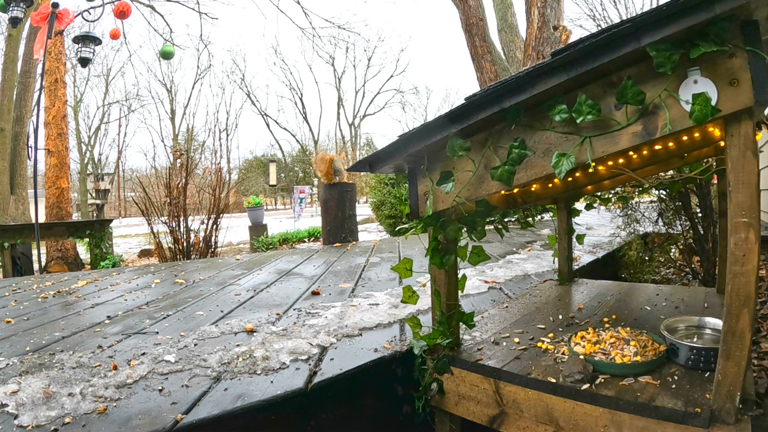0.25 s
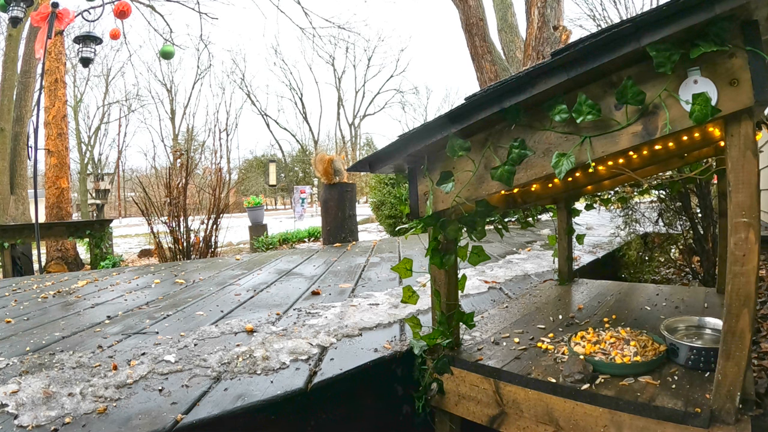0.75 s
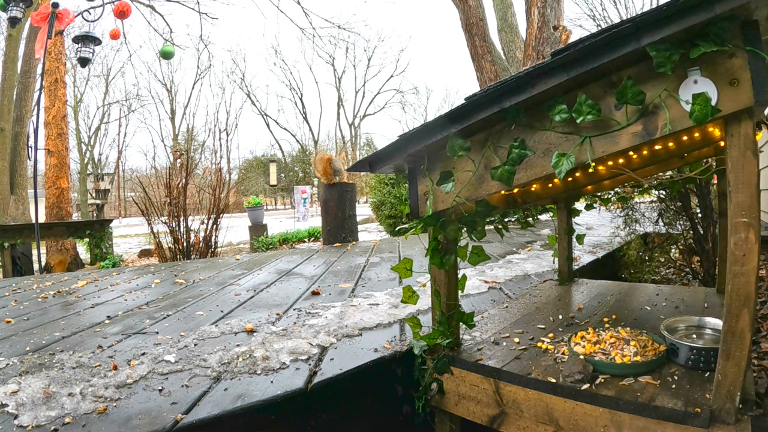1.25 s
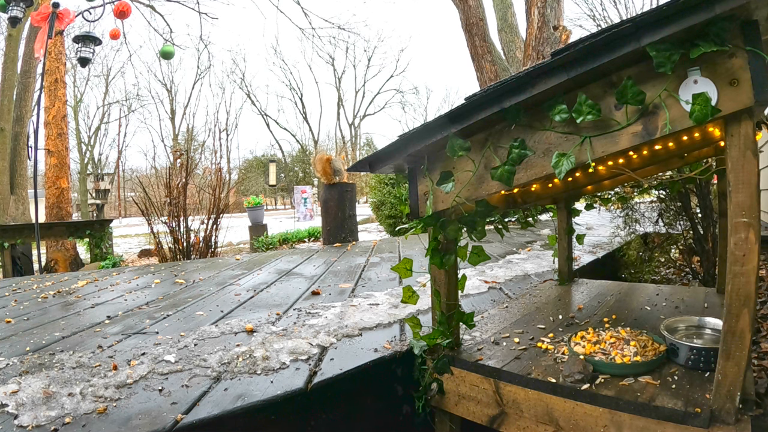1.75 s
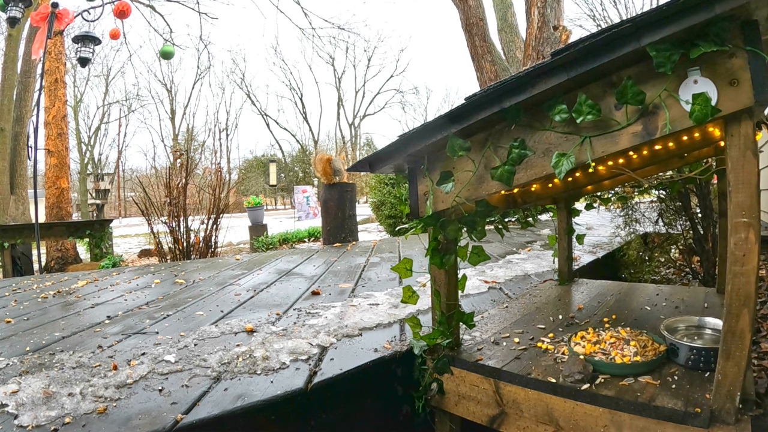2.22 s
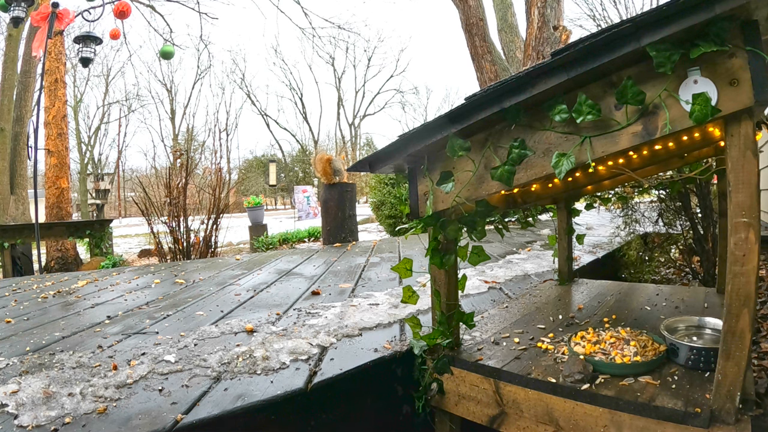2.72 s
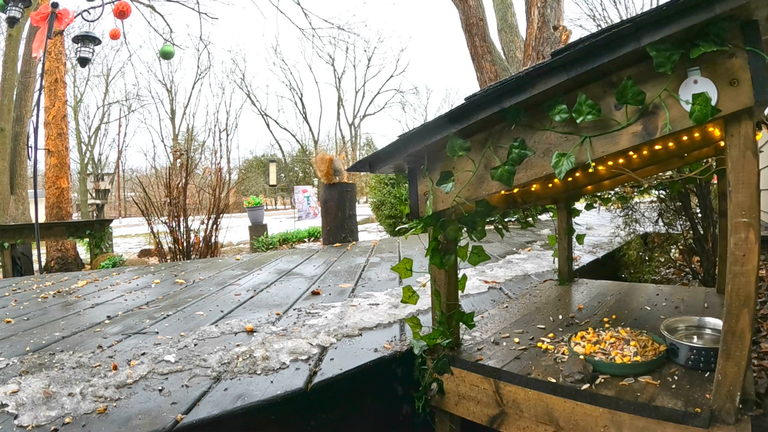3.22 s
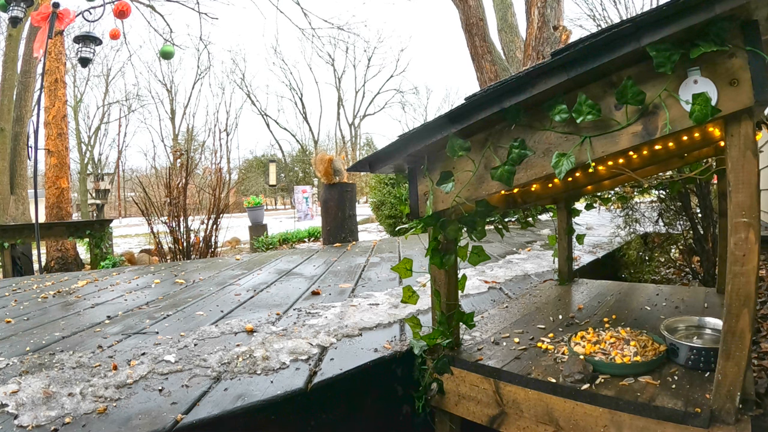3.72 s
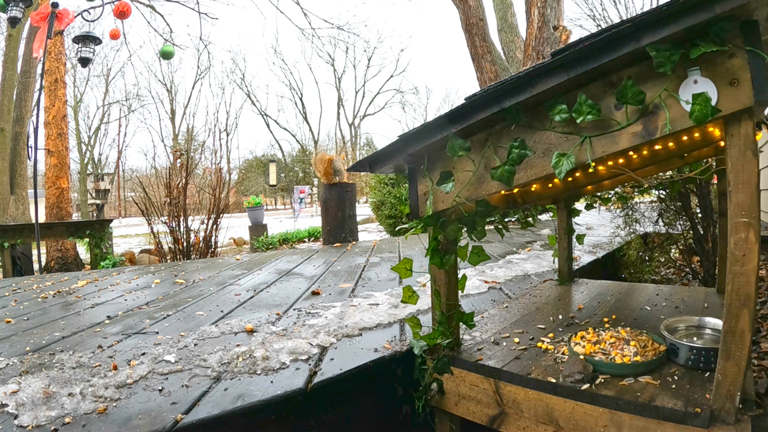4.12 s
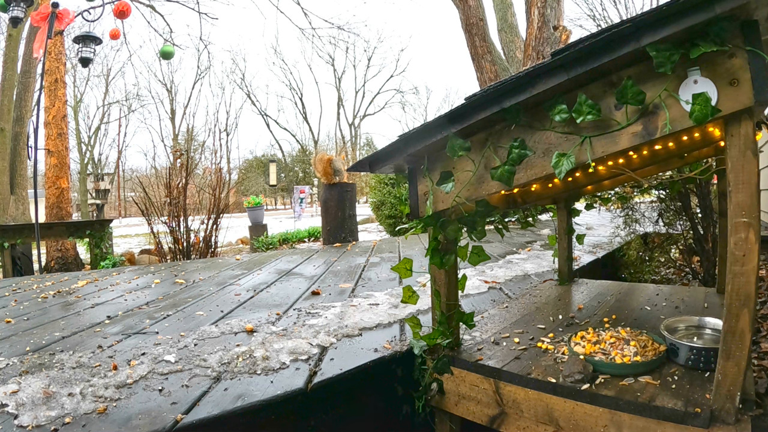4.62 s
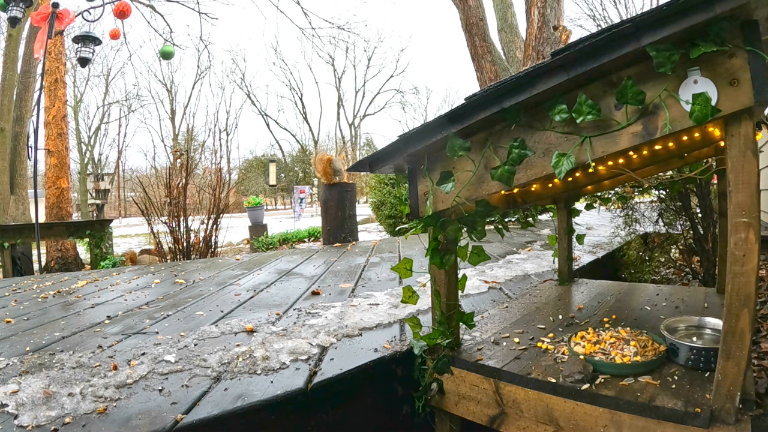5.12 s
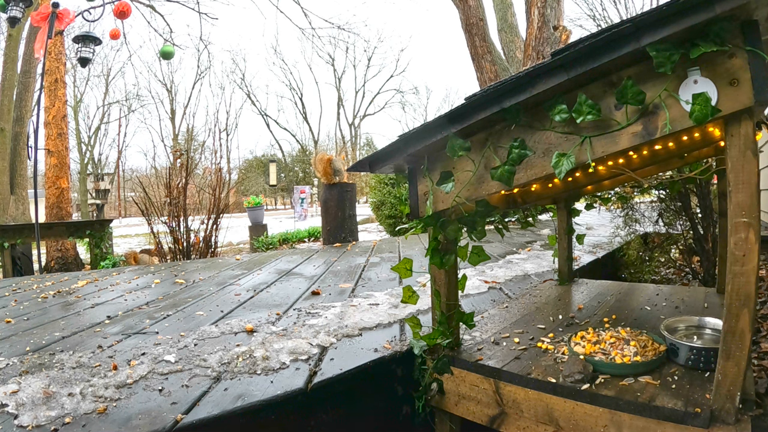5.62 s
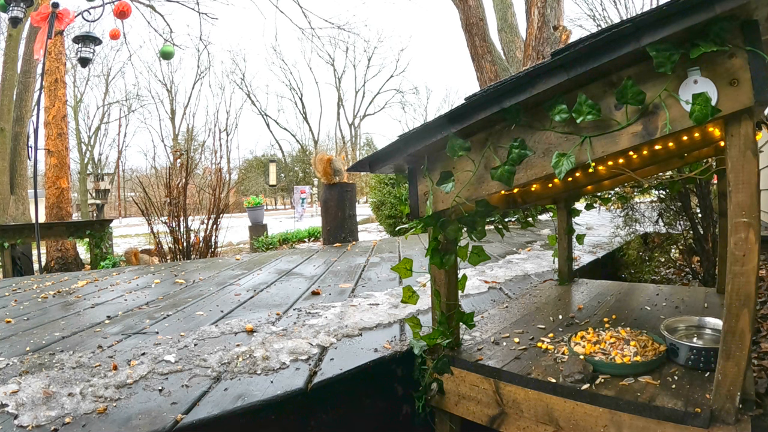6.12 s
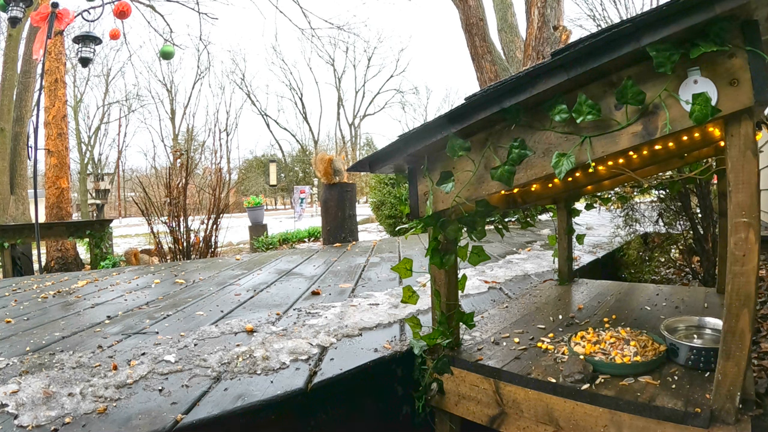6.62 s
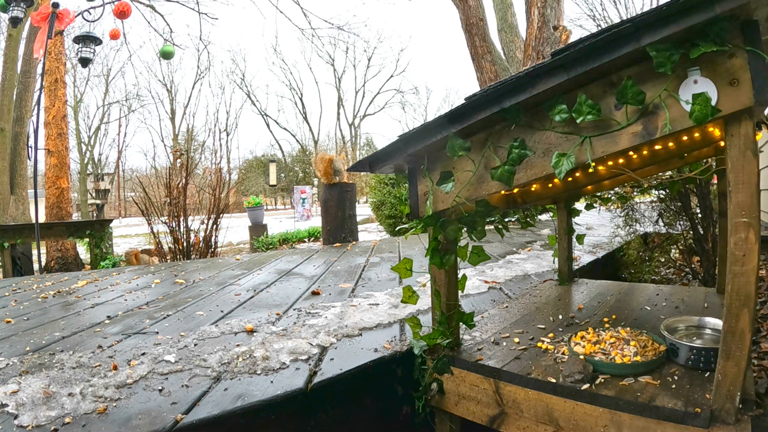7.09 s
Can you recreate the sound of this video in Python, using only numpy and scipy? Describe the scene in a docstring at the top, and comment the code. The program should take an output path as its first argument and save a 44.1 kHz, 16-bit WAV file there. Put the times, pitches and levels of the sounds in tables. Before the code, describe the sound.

Many small songbirds chirp in dense overlapping chatter over low rumbling air, with soft wooden thumps around a backyard feeding shelter.

```python
"""A low rumble of air opens the scene, and at once small songbirds chatter round a wooden feeding shelter
in a snowy yard. Each chirp is a gliding whistle, clean or raspy; squawks add rushing air to a tumbling pitch.
Soft thumps ring the shelter's damped boards, beak clicks are bursts of noise, and a jay cries twice further off
in harmonics shaped by its throat. Boards mirror the birds and trees scatter them, over far engine and road noise."""
import sys
import numpy as np
from scipy import signal
from scipy.fft import rfft, irfft, next_fast_len
from scipy.io import wavfile
from scipy.ndimage import map_coordinates

SR = 44100
rng = np.random.default_rng(int(sys.argv[2]) if len(sys.argv) > 2 else 0)


def wav_out(sig):
    """Save sig, one row per channel (or a flat mono array), as 16-bit PCM at SR to the path in sys.argv[1]."""
    wavfile.write(sys.argv[1], SR, np.round(np.clip(np.atleast_2d(sig).T, -1, 1) * 32767).astype(np.int16))


N = 324135
TIME = np.arange(N) / SR


def undb(db):
    """Decibel law: level to amplitude ratio."""
    return 10 ** (np.asarray(db) / 20)


def unit(x):
    """Normalisation: scale to rms 1."""
    return x / np.sqrt(np.mean(x ** 2) + 1e-20)


def pan(db):
    """Interaural level difference: left and right gains, left minus right in dB, at equal power."""
    return unit(undb(np.array([[db], [-db]]) / 2))


def add(out, start, sound):
    """Superposition: mix a sound in at a time in seconds."""
    i = max(int(start * SR), 0)
    out[..., i:i + sound.shape[-1]] += sound[..., :N - i]


def colour(hz, points):
    """Spectral envelope: gain from (f/Hz, level/dB) points on a logarithmic frequency axis."""
    f, db = np.transpose(points)
    return undb(np.interp(np.log(hz + 1e-9), np.log(f), db))


def noise(points, size):
    """Filtered noise: a random spectrum under a given envelope, rms 1."""
    spectrum = rfft(rng.standard_normal(size))
    gain = colour(np.fft.rfftfreq(size, 1 / SR), points)
    return unit(irfft(spectrum * gain, size))


def wander(rate, size):
    """Random modulation: smooth motion through `rate` random values a second, spread about 1."""
    place = np.arange(size) * rate / SR
    values = rng.standard_normal(int(place[-1]) + 3)
    return map_coordinates(values, [place + 1], order=3, mode="nearest")


def wide(points, side_db):
    """Partial coherence: noise common to both ears plus a weaker part of opposite sign."""
    middle, side = noise(points, N), noise(points, N)
    return unit(middle + undb(side_db) * side * np.array([[1], [-1]]))


def swell(u, attack, release):
    """Amplitude envelope: rounded rise and fall over a call, u from 0 to 1."""
    edge = np.minimum(u / attack, (1 - u) / release)
    return np.sin(np.pi / 2 * np.clip(edge, 0, 1)) ** 2


# low air rumble: t/s, level/dB before the overall trim
AIR_RUMBLE = [(0, -38), (.6, -36), (.9, -32), (1.55, -31.5), (1.8, -29.5), (2.15, -29.5), (2.3, -35.5),
              (2.6, -32), (3, -39), (3.65, -37.5), (3.83, -29.5), (4.1, -37.5), (4.6, -36), (6, -36),
              (6.5, -35), (7.1, -40.5)]
# spectrum of the air rumble: f/Hz, relative level/dB per Hz
AIR_RUMBLE_SPECTRUM = [(15, 1), (32, 4.5), (60, 1.5), (90, 0), (130, -13), (180, -17.5), (250, -20.5),
                       (350, -32.5), (500, -43), (1500, -59), (5000, -88)]
# far engine: t/s, mean firing rate f/Hz, level/dB before the overall trim
FAR_ENGINE = [(0, 63.9, -41.5), (4.3, 60.13, -51), (4.7, 59.14, -47), (5.1, 63.52, -41),
              (5.75, 66.34, -39.5), (6.3, 66.35, -40.5), (6.7, 60.02, -43), (7.35, 60.8, -33.5)]
# spectrum of tyres on a road: f/Hz, relative level/dB per Hz
ROAD_SPECTRUM = [(100, 1.5), (300, -6.5), (480, -10.5), (700, -4.5), (980, 1), (1400, -3.5), (2000, -9.5),
                 (3200, -18), (5000, -29), (8000, -39), (14000, -58)]


def background(rumble_db=1.0, road_db=-49.5, engine_db=-1):
    """Broadband and periodic sources: air rumble and tyre hush are noise, the far engine a two-partial hum."""
    rumble_level = np.interp(TIME, *np.transpose(AIR_RUMBLE)) + rumble_db
    rumble = wide(AIR_RUMBLE_SPECTRUM, side_db=-13.5) * undb(rumble_level) * pan(-1.4)

    s, hz, db = np.transpose(FAR_ENGINE)
    firing_hz = np.interp(TIME, s, hz) * (1 + 0.017 * wander(15, N))
    phase = 2 * np.pi * np.cumsum(firing_hz) / SR
    hum = unit(np.sin(phase) + undb(-9.0) * np.sin(2 * phase))
    engine = hum * undb(np.interp(TIME, s, db) + engine_db + 2 * wander(9.9, N))

    road_level = road_db + .5 * wander(1.706, N) + .5 * wander(12, N)
    road = wide(ROAD_SPECTRUM, side_db=-6.5) * undb(road_level) * pan(3.2)
    return rumble + engine + road


def chirp(start, length, shape, turn_hz, rasp, overhang=.005, waver=0.02, rasp_waver=0.0478,
          flutter_db=2.5, rasp_noise=1.0, stress_db=10, second_db=-27, third_db=-41):
    """Frequency modulation: the syrinx glides through a rounded turn; rasp shakes its pitch and strength."""
    place, start_ratio, end_ratio, stress = shape
    turn = start + length * np.clip(place, 0, 1)
    t = np.arange(start - overhang, start + length + overhang, 1 / SR)
    n, rasp = len(t), np.clip(rasp, 0, 1)

    # distance from the turn: 0 there, 1 at the start or the end
    before = np.clip((t - turn) / min(start - turn, -1e-3), 0, 1.2) ** 1.6
    after = np.clip((t - turn) / max(start + length - turn, 1e-3), 0, 1.2) ** 1.6
    hz = turn_hz * (1 + (start_ratio - 1) * before + (end_ratio - 1) * after)
    hz = hz * (1 + waver * wander(196.9, n) + rasp_waver * rasp * wander(894, n))
    phase = 2 * np.pi * np.cumsum(hz) / SR

    # irregular motion of the membranes spreads a band of noise round the whistle
    shake = 1 + rasp_noise * rasp * (wander(996, n) + 1j * wander(1011.0, n))
    tone = np.exp(1j * phase) + undb(second_db) * np.exp(2j * phase)
    tone = tone + undb(third_db) * np.exp(3j * phase) * (hz < SR / 6)  # keep the third below SR / 2
    u = np.linspace(0, 1, n)
    level_db = flutter_db * wander(176.0, n) - stress_db * abs(u - stress)
    pressure = swell(u, attack=0.1, release=0.078) * undb(level_db)
    return unit(np.imag(shake * tone) * pressure)


# air rushing through a squawk: f/Hz, relative level/dB per Hz
SQUAWK_AIR_SPECTRUM = [(1400, -28), (3200, -10), (5000, -13), (8500, -1), (12000, -7), (16000, -34)]


def squawk(half, hz, swing=.07, climb=0.026, overtone_db=-14, air_db=-8):
    """Forced oscillation: the pitch climbs and tumbles fast, with some rushing air."""
    t = np.arange(-2 * half, 2 * half, 1 / SR)
    n = len(t)
    pitch = hz * (1 + climb * t / half + swing * wander(300, n) + 0.0513 * wander(1200, n))
    phase = 2 * np.pi * np.cumsum(pitch) / SR
    air = noise(SQUAWK_AIR_SPECTRUM, n)
    voice = unit(np.sin(phase) + undb(overtone_db) * np.sin(2 * phase))
    return unit(voice + undb(air_db) * air) * np.exp(-(t / half) ** 2) * undb(3.4 * wander(304.0, n))


def perch(sound, pan_db, spread_s=3.4e-5):
    """Interaural time and level difference: a level for each ear and a slight random lag between them."""
    lag = int(round(spread_s * SR * rng.standard_normal()))
    return np.array([np.roll(sound, lag), sound]) * pan(pan_db)


# near chirps, and one faint, low further call at 4.038 s: t/s at the start, length/s, note shape, f/Hz at the
# turn, # level/dB before the flock trim, rasp 0-1, left minus right level/dB
NEAR_CHIRPS = [(0.02, 0.11, "arch", 3760, -43, 0.3, 7), (0.136, 0.043, "fall", 3300, -42, .1, 0.5),
               (.22, 0.027, "rise", 6950, -51.5, 0.5, 5), (0.237, .034, "rise", 5520, -46, 0.1, 5),
               (.271, .054, "hook", 4090, -39, 0.17, 5), (.327, 0.025, "rise", 3817, -47.5, 0.4, 5),
               (.354, 0.061, "peak", 3820, -45.5, 0.45, 3), (0.57, .05, "fall", 3550, -64, .3, 8),
               (0.777, 0.036, "flat", 2850, -53, 0.9, -2), (.808, 0.038, "step", 4670, -51.5, 0.3, -12),
               (0.873, 0.056, "lift", 2685, -45, 0.3, 0), (0.88, 0.046, "dip", 5300, -55.5, 0.8, -1),
               (0.928, 0.018, "hook", 4040, -46.5, 0.54, -3), (0.98, 0.1, "slide", 4340, -49, 0.24, 5),
               (1.069, 0.061, "slide", 2620, -50.5, .3, 7), (1.215, 0.037, "arch", 5330, -43.5, 0.4, 4),
               (1.247, 0.067, "flat", 5250, -53, 0.7, 0), (1.285, 0.053, "peak", 4210, -44.5, 0.7, 0),
               (1.327, .053, "hook", 3420, -44, 0, -1), (1.379, 0.06, "arch", 4470, -39, 0.4, 6),
               (1.454, 0.075, "rise", 4170, -42, 0.46, 0), (1.471, .042, "arch", 4870, -43, .3, 7),
               (1.526, 0.059, "arch", 3660, -39.5, 0.68, 3), (1.728, .11, "peak", 4550, -58.5, 0.73, 5),
               (1.886, 0.047, "hook", 4264, -36.5, 0.77, 6), (1.905, 0.031, "hook", 5470, -43, 0.7, 4),
               (1.935, 0.067, "arch", 3506, -38.5, 0.47, 4), (1.984, 0.053, "rise", 4430, -38.5, 0.16, 8),
               (2.051, .036, "fall", 3440, -48, 0.54, 9), (2.094, .04, "rise", 5360, -47, 0.46, -3),
               (2.116, 0.047, "arch", 3510, -41, 0.3, -2), (2.162, 0.034, "flat", 3083, -39.5, 0, 1.5),
               (2.195, 0.06, "peak", 5520, -45, 0.17, 5), (2.257, 0.033, "peak", 4940, -40, 0.3, 6),
               (2.281, 0.047, "hook", 4400, -42, 0.36, 2), (2.392, 0.05, "arch", 5000, -39, 0.15, 2),
               (2.447, 0.039, "arch", 4230, -40.5, 0.2, 5), (2.478, 0.051, "rise", 4140, -40.5, 0.4, 7),
               (2.504, 0.031, "step", 2610, -49.5, 0.53, 7), (2.539, 0.057, "slide", 3600, -43, 0.16, 10),
               (2.58, 0.052, "arch", 3590, -42, 0.88, 3), (2.612, 0.048, "lift", 3124, -43.5, 0.74, -1),
               (2.647, 0.048, "flat", 7740, -46.5, 0, 4), (2.679, 0.076, "step", 6010, -40.5, 0.32, 5),
               (2.731, 0.056, "peak", 4530, -38.5, 0.5, 5), (2.74, .1, "flat", 5840, -48.5, 0.17, 2),
               (2.793, 0.06, "dip", 3080, -37.5, 0.02, 5), (2.846, 0.029, "slide", 3170, -46.5, 0.2, 2),
               (2.884, 0.071, "hook", 4410, -36, 0.18, 3), (2.964, 0.051, "rise", 3670, -47, 0.17, 0),
               (2.984, 0.034, "hook", 4880, -35.5, 0.6, 9), (3.021, 0.058, "hook", 4960, -42, 0.4, -3),
               (3.037, 0.081, "rise", 3730, -45, 0.3, 4), (3.05, 0.0224, "step", 7340, -47, 0.1, 0),
               (3.197, 0.055, "hook", 4650, -37.5, 0.77, 7), (3.237, 0.051, "arch", 3990, -41, 0.6, 9),
               (3.282, 0.044, "hook", 4780, -40.5, 0.37, 5), (3.313, .02, "rise", 5070, -41.5, 0.45, 3),
               (3.328, 0.059, "fall", 3900, -44.5, 0, 9), (3.375, 0.049, "hook", 4920, -42, 0.74, 5),
               (3.43, 0.029, "lift", 3000, -44.5, 0, -1), (3.446, 0.067, "dip", 2990, -48, 0.4, 1),
               (3.525, 0.041, "arch", 4350, -38, .5, 9), (3.559, 0.021, "step", 5080, -36, 0, -1),
               (3.578, 0.025, "slide", 4050, -31.5, 0, -1), (3.604, 0.053, "flat", 3427, -34.5, 0.43, 3),
               (3.655, 0.068, "dip", 3150, -42, 0.98, 10), (3.723, 0.069, "hook", 4870, -42.5, 0.33, 4),
               (3.764, 0.077, "dip", 3022, -41.5, 0.57, 2), (3.81, 0.041, "arch", 3790, -47, 0.38, 2),
               (3.816, 0.045, "slide", 2540, -48.5, 0.25, 8), (3.823, 0.057, "fall", 4800, -43.5, 0.2, 4),
               (3.907, 0.049, "hook", 4970, -42, 0.7, 4), (3.964, 0.033, "lift", 2984, -41, 0, 11),
               (4.004, 0.031, "fall", 3630, -48.5, 0.6, 6), (4.033, .058, "rise", 5360, -49, 0.77, 5.5),
               (4.038, 0.18, "arch", 1900, -55.5, 0.9, 0), (4.076, .055, "lift", 3070, -45, 0.4, 4),
               (4.133, 0.058, "hook", 4375, -36, 0.47, 3), (4.166, 0.073, "hook", 5900, -44, 0.1, 4),
               (4.201, 0.022, "lift", 3010, -37.5, 0.4, 2), (4.224, 0.054, "arch", 5520, -41.5, 0.02, 5),
               (4.278, 0.055, "fall", 4580, -45.5, 0.95, 3), (4.331, 0.057, "step", 4620, -42.5, 0.07, 10),
               (4.355, 0.057, "flat", 7670, -51.5, .1, 5), (4.396, 0.054, "hook", 4550, -38, 0.5, 4),
               (4.402, 0.073, "flat", 5700, -43.5, 0.2, 1), (4.465, 0.0398, "flat", 3770, -38, 0.3, 3),
               (4.516, 0.036, "lift", 2935, -46.5, .4, -3), (4.539, 0.069, "hook", 4500, -36.5, 0.47, 3),
               (4.612, 0.061, "flat", 3366, -36, 0.47, 2), (4.68, 0.022, "rise", 4820, -44, 0.2, 7),
               (4.709, 0.044, "fall", 4230, -44.5, 0.06, 5), (4.761, 0.047, "step", 4940, -36, 0.02, 5),
               (4.783, 0.077, "dip", 3160, -40, 0.43, 0), (4.848, 0.033, "slide", 3480, -42, .7, 3),
               (4.975, 0.052, "rise", 5045, -37, 0.65, 8), (5.054, 0.07, "peak", 3830, -41, 0.67, 0.5),
               (5.094, 0.053, "arch", 5490, -40.5, 0, 12), (5.112, 0.052, "arch", 3335, -43.5, 0.43, 0),
               (5.169, 0.023, "lift", 3800, -37, 0.06, 4), (5.191, 0.031, "fall", 4920, -39.5, 0.5, 6),
               (5.217, 0.036, "flat", 4570, -49, .3, 9), (5.244, 0.042, "arch", 4030, -44.5, 0.1, 5),
               (5.272, 0.06, "arch", 3240, -49, .1, 19), (5.374, 0.03, "arch", 4390, -45, 0.3, 13),
               (5.431, 0.043, "peak", 3660, -44.5, 0, 23), (5.483, 0.052, "arch", 5020, -40.5, 0.5, 0),
               (5.529, 0.067, "dip", 2974, -39.5, 0.36, 2), (5.534, 0.062, "fall", 4350, -39, 0.36, 6),
               (5.552, 0.051, "arch", 5330, -42.5, 0.43, 4), (5.591, 0.04, "dip", 3320, -38, 0.46, 3),
               (5.622, 0.043, "dip", 3117, -39, 0.67, 2), (5.724, 0.064, "hook", 6580, -44.5, 0.66, 1),
               (5.818, .03, "dip", 4000, -49, 0.3, 9), (5.842, 0.024, "step", 5330, -47, 0.24, 1),
               (5.846, 0.039, "arch", 3730, -46, 0.05, 13), (5.953, 0.059, "flat", 5450, -52, 0.2, 2),
               (5.985, 0.044, "arch", 4503, -41, 0.5, 5), (6.028, 0.058, "hook", 3975, -42, 0.04, 3),
               (6.073, 0.022, "flat", 3100, -43, 0.4, 4), (6.084, .042, "arch", 4730, -40.5, .3, 8),
               (6.103, 0.069, "slide", 3547, -40.5, 0.43, 2), (6.179, 0.026, "rise", 4350, -44.5, .3, 1),
               (6.215, 0.061, "flat", 3256, -44, 0.85, 10), (6.369, 0.041, "hook", 5240, -37, 0, 2),
               (6.455, 0.035, "hook", 4405, -40.5, 0.17, 5), (6.511, 0.04, "hook", 4940, -40, 0.16, 8),
               (6.558, 0.051, "flat", 4520, -41, 0.62, 5), (6.6, 0.079, "hook", 3930, -43.5, 0.7, 5),
               (6.708, 0.052, "arch", 4055, -40, 0.6, 7), (6.772, 0.032, "arch", 4600, -44, 0.66, -3),
               (6.782, 0.049, "arch", 4046, -38, 0.7, -1), (6.824, 0.048, "flat", 3483, -43, 0.54, 1),
               (7.006, 0.042, "rise", 5900, -48, 0.57, 6), (7.039, 0.082, "arch", 3816, -38, 0.36, 7),
               (7.146, 0.0434, "flat", 7600, -50, 0.2, 4), (7.18, 0.025, "flat", 5040, -42, .3, 8),
               (7.221, 0.034, "flat", 3125, -36, 0.33, 4), (7.259, 0.039, "hook", 4280, -39.5, 0.25, -2),
               (7.295, 0.046, "fall", 4020, -46, 0.46, 5)]
# note shapes, by name: place of the turn 0-1, start f / turn f, end f / turn f, loudest point 0-1
CHIRP_SHAPES = {"arch": (0.47, .78, .77, 0.59), "peak": (0.5, .63, .63, 0.61),
                "hook": (0.252, .8, .73, 0.51), "step": (0.19, 0.66, .94, 0.26), "rise": (.8, .75, 1, 0.51),
                "lift": (0.16, 1.2, 1.38, 0.49), "dip": (0.484, 1.18, 1.3, 0.59),
                "fall": (0.151, 1.02, .75, 0.57), "slide": (0.23, 1.2, .77, 0.5),
                "flat": (0.373, .92, .93, 0.45)}
# hoarse squawks: t/s at the middle, half length/s, level/dB before the flock trim, centre f/Hz
NEAR_SQUAWKS = [(0.065, 0.03, -44, 4690), (0.818, 0.023, -52.5, 5160), (1.22, 0.031, -54, 7400),
                (1.88, 0.02, -53, 4640), (3.054, 0.017, -51, 6760), (3.273, 0.02, -47.5, 7230),
                (3.593, 0.034, -46.5, 6020), (3.996, 0.072, -57, 6500), (4.55, 0.043, -44, 5860),
                (5.363, 0.019, -50, 7600), (5.514, 0.052, -47.5, 5760), (5.737, 0.034, -50.5, 6940),
                (5.82, 0.027, -54.5, 8240), (6.333, 0.025, -49.5, 6090), (6.539, 0.05, -50.5, 6330),
                (6.724, 0.043, -51.5, 5200), (7.201, 0.061, -53.5, 5560)]


def flock(chirp_db=-3.0, squawk_db=0.5):
    """Superposition of sources: chirps each from their own side, hoarse squawks all somewhat to the left."""
    out = np.zeros((2, N))
    for start, length, shape, hz, db, rasp, pan_db in NEAR_CHIRPS:
        note = chirp(start, length, CHIRP_SHAPES[shape], hz, rasp)
        add(out, start - .005, perch(note, pan_db) * undb(db + chirp_db))
    for middle, half, db, hz in NEAR_SQUAWKS:
        note = squawk(half, hz)
        add(out, middle - 2 * half, perch(note, pan_db=3.5) * undb(db + squawk_db))
    return out


def shared_activity(idle_db=-80, chirp_db=-15, squawk_db=-2.5, swell_s=0.053):
    """Shared activity: the further chatter swells around each near call, most around squawks."""
    calls = [(start + length / 2, db + chirp_db) for start, length, _, _, db, _, _ in NEAR_CHIRPS]
    calls += [(middle, db + squawk_db) for middle, _, db, _ in NEAR_SQUAWKS]
    t = TIME[::100]
    power = undb(idle_db) ** 2
    for s, db in calls:
        power = power + undb(db) ** 2 * np.exp(-((t - s) / swell_s) ** 2)
    return np.interp(TIME, t, np.sqrt(power))


def chatter(count=330, chatter_db=-2, low_hz=2900, high_hz=7500, high_db=-7, scatter_db=2.5):
    """Random superposition: further birds' short, rough notes swell and fade around the near calls."""
    out = np.zeros((2, N))
    draws = rng.random((count, 9))
    for k, (when, length, pitch, lean, first, last, rasp, side, loud) in enumerate(draws):
        start = (k + when) * N / SR / count
        span = 0.023 + .04 * length
        hz = low_hz * (high_hz / low_hz) ** pitch
        shape = (0.1975 + .6 * lean, 0.79 + .35 * first, 0.64 + 0.46 * last, lean)
        note = chirp(start, span, shape, hz, 0.24 + 0.55 * rasp, waver=0.0342, flutter_db=0.0,
                     second_db=-10.5, third_db=-17.5)
        level_db = high_db * pitch + scatter_db * (2 * loud - 1)
        add(out, start, note * undb(level_db) * pan(2 + 12 * (side - .5)))
    return unit(out) * shared_activity() * undb(chatter_db)


# thumps on the shelter: t/s, low push level/dB and board ring level/dB before trims
SHELTER_THUMPS = [(0.666, -25.5, -38), (0.719, -21, -37), (0.761, -22.5, -36.5), (0.859, -18, -32.5),
                  (0.97, -24, -28.5), (0.986, -24, -26.5), (1.028, -23, -34), (1.155, -17.5, -34),
                  (1.488, -34, -26.5), (1.501, -30, -26.5), (1.553, -32, -35), (1.631, -20, -36),
                  (1.752, -14, -27), (1.779, -32, -35), (1.857, -16.5, -35), (1.9, -29, -32),
                  (2.04, -18, -29), (2.123, -24, -34.5), (2.218, -20.5, -64), (2.522, -19, -24),
                  (2.538, -22, -32), (2.683, -25, -35), (3.839, -18.5, -28)]
# modes of the boards: mean f/Hz, relative level/dB, time to fall 60 dB t60/s
BOARD_MODES = [(121.7, 7.5, 0.11), (157.5, 9, 0.074), (218, 1, 0.078), (302, -13.5, 0.1), (366, -18, 0.091)]


def thumps(push_db=-4, ring_db=0, push_s=0.0058):
    """Impulse response of damped modes: each soft blow heaves the shelter once and rings its boards."""
    out, t = np.zeros(N), np.arange(SR // 6) / SR
    for start, low_db, board_db in SHELTER_THUMPS:
        u = t / push_s - 2
        heave = -u * np.exp(-u ** 2 / 2) * np.minimum(t / 0.0029, 1)
        ring = np.zeros(len(t))
        for hz, db, t60 in BOARD_MODES:
            mode_hz = hz * (1 + 0.093 * rng.standard_normal())  # random spread of mode pitch from thump to thump
            ring += undb(db - 60 * t / t60) * np.sin(2 * np.pi * mode_hz * t)
        ring *= 1 - np.exp(-t / 0.0022)
        add(out, start, 2 * heave * undb(low_db + push_db) + ring * undb(board_db + ring_db))
    soften = signal.butter(4, 520, fs=SR, output="sos")
    return signal.sosfilt(soften, out) * pan(-9.5)


# beak clicks: t/s, level/dB before decay and pan
BEAK_CLICKS = [(2.04, -35), (5.878, -27.5)]


def ticks():
    """Impulsive excitation: a beak snaps on a seed, a noise burst dying within milliseconds."""
    out, t = np.zeros(N), np.arange(SR // 50) / SR
    spectrum = [(1500, -19), (4000, -5.5), (6000, 6), (9000, -7), (15000, -25)]  # f/Hz, level/dB
    for start, db in BEAK_CLICKS:
        add(out, start, noise(spectrum, len(t)) * np.exp(-t / 0.0005) * undb(db))
    return out * pan(3)


# jay cries: start t/s, end t/s, first f/Hz, last f/Hz, level/dB before distance and pan
JAY_CRIES = [(6.221, 6.43, 854, 798, -46.5), (6.486, 6.716, 839, 783, -49)]
# resonance of the jay's throat: f/Hz, relative level/dB
JAY_THROAT_GAIN = [(800, -28), (1650, -7.5), (2480, -1.5), (3300, -2), (4100, -6), (4950, -6), (5750, 0),
                   (6600, -9), (8000, -17), (11000, -32)]


def jay():
    """Source and filter: a harsh, slowly falling harmonic series weighted by the throat."""
    out = np.zeros(N)
    for start, end, first_hz, last_hz, db in JAY_CRIES:
        u = np.linspace(0, 1, int((end - start) * SR))
        hz = (first_hz + (last_hz - first_hz) * u) * (1 + 0.011 * wander(510, len(u)))
        phase = 2 * np.pi * np.cumsum(hz) / SR
        cry = sum(colour(k * hz, JAY_THROAT_GAIN) * np.sin(k * phase) for k in range(1, 14))
        add(out, start, unit(cry * swell(u, attack=0.4, release=0.18)) * undb(db))
    return out * pan(0.98)


# mirror images in deck, roof and walls: mean delay t/s, level/dB before the echo trim
MIRROR_ECHOES = [(.0021, -2), (.0047, -10.5), (.0088, -5.5), (0.0174, -29), (.026, -16)]


def yard(x, echo_db, near_db, near_t60, far_db, far_t60):
    """Reflection and scattering: boards mirror sound, fence and house scatter it, trees leave a thin tail."""
    t, out = np.arange(SR) / SR, []
    for ear in x:
        response = np.zeros(SR)
        for db, t60 in ((near_db, near_t60), (far_db, far_t60)):
            tail = rng.standard_normal(SR) * undb(-60 * t / t60) * np.minimum(t / 0.028, 1)
            response += undb(db) * unit(tail) / np.sqrt(SR)  # unit energy before its level
        for delay, db in MIRROR_ECHOES:
            arrival = abs(delay + .0002 * rng.standard_normal())
            response[int(arrival * SR)] += undb(db + echo_db)
        response[0] += 1  # direct sound
        out.append(signal.fftconvolve(ear, response)[:N])
    return np.array(out)


def shade(x, lag_s=2.8e-5):
    """Acoustic shadow: the shelter dims the highest treble more on the right; the left arrives later."""
    size = next_fast_len(N + SR // 10)
    hz = np.fft.rfftfreq(size, 1 / SR)
    left = colour(hz, [(5000, 1.0), (9000, -5.0), (12000, -1.5), (15000, -21.0)])
    left = left * np.exp(-2j * np.pi * hz * lag_s)
    right = colour(hz, [(5000, 2), (9000, -6.5), (12000, -10), (15000, -32)])
    return irfft(rfft(x, size) * np.array([left, right]), size)[:, :N]


def scene():
    """Superposition of fields: jay and chatter leave a stronger long tail; thumps and background stay dry."""
    near = yard(flock() + ticks(), echo_db=-1, near_db=-5, near_t60=.25, far_db=-16, far_t60=.8)
    further = undb(-2.5) * jay() + chatter()
    far = yard(further, echo_db=0.0, near_db=-6.0, near_t60=0.18, far_db=-12.5, far_t60=0.84)
    return shade(near + far) + thumps() + background()


def record(dry):
    """Band limiting: the sound fades in over 4 ms and loses its deepest rumble and its top."""
    opened = dry * np.minimum(TIME / .004, 1)
    low_cut = signal.butter(2, 16, "high", fs=SR, output="sos")
    top_cut = signal.ellip(8, .2, 70, 14900, fs=SR, output="sos")
    return signal.sosfilt(top_cut, signal.sosfilt(low_cut, opened))


dry = scene()
out = record(dry)
wav_out(out)
```